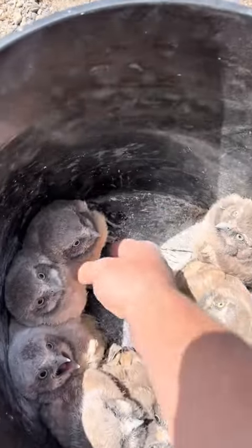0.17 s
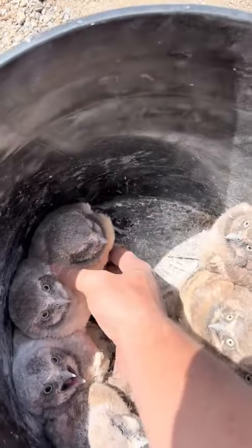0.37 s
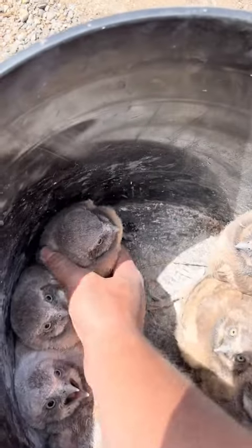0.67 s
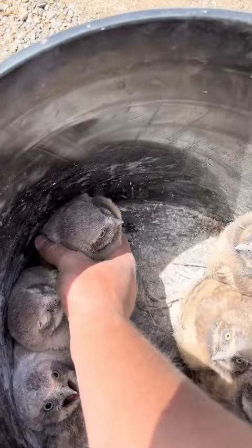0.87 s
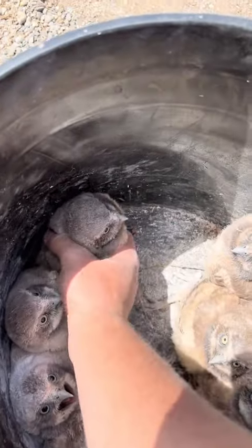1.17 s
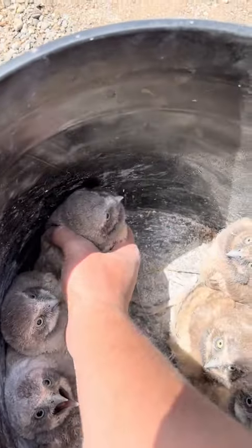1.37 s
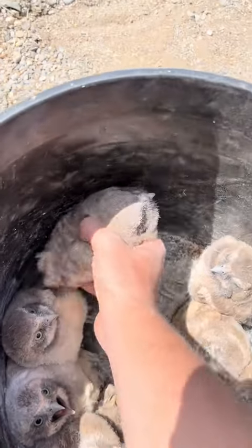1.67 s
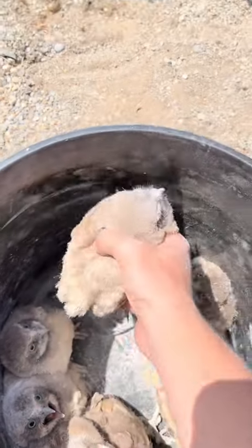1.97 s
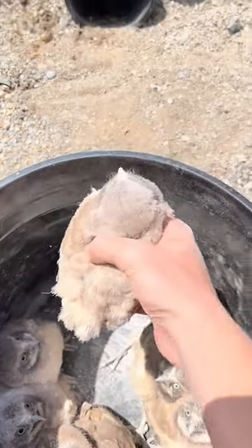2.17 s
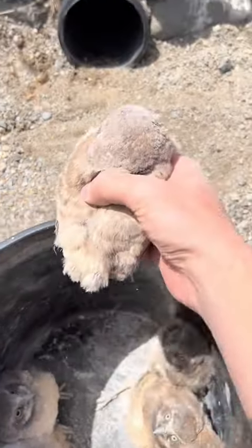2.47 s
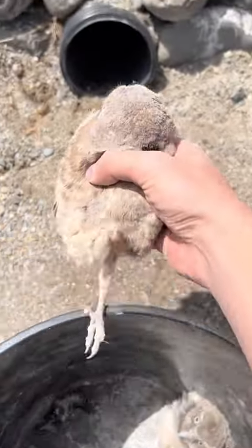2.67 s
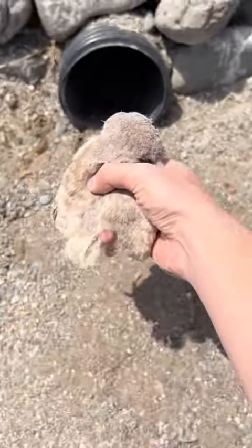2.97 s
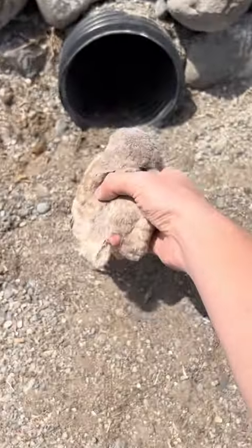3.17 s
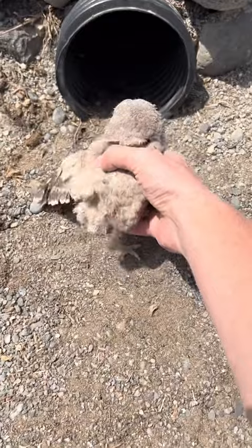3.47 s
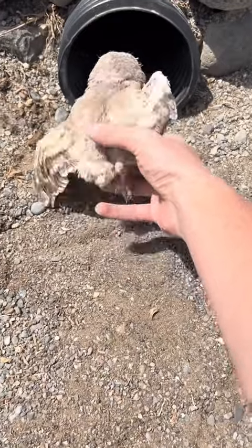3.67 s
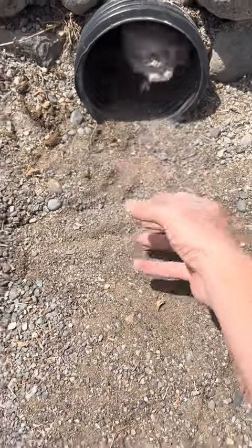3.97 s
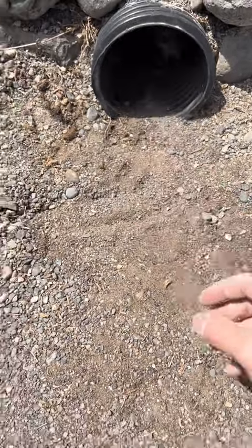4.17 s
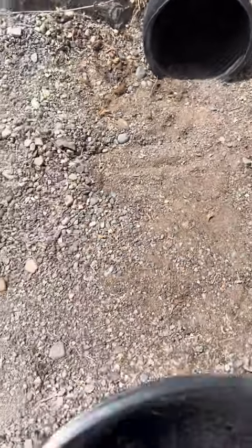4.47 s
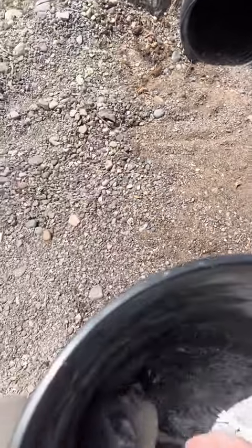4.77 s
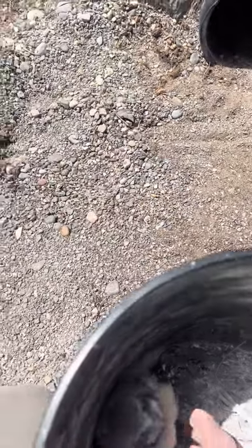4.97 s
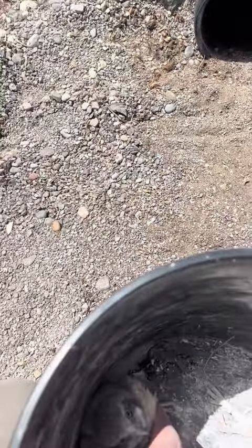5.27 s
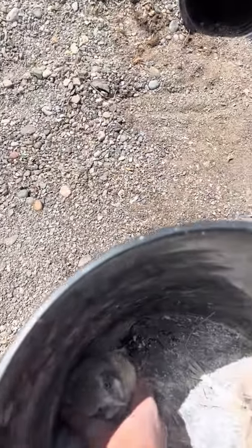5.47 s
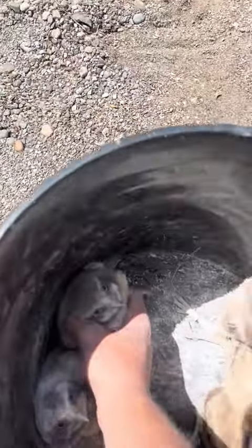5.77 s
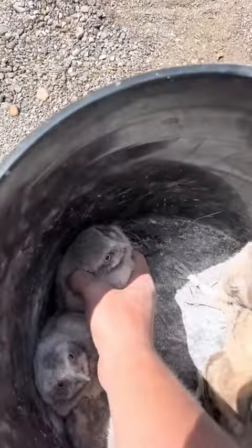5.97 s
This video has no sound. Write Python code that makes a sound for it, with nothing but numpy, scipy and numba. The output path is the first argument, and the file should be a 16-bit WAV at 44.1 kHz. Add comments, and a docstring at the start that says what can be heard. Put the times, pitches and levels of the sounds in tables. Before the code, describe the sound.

Close outdoor capture of owl chicks in a plastic bucket. A loud, rasping, high hiss runs about two seconds with dull handling thumps, then stops abruptly. A quieter gap holds faint down rustle and tiny taps. A softer, smoother hiss follows as a chick is carried to a pipe, with bumps at release, then a louder, brighter hiss takes over until the end.

```python
"""Long rattlesnake-like hisses of burrowing owl chicks, lifted by hand from a plastic bucket into a burrow pipe.
Fluttering noise excites a gliding throat resonance and the band of the open beak; near surfaces reflect it.
Noise bursts through damped resonators give the dull bumps and plastic knocks of handling.
Swelling filtered noise gives a faint rustle; shaped noise gives microphone rumble and quiet outdoor air."""
import sys
import numpy as np
from scipy import signal
from scipy.fft import rfft, irfft, next_fast_len
from scipy.io import wavfile
from numba import njit

SR = 44100
rng = np.random.default_rng(int(sys.argv[2]) if len(sys.argv) > 2 else 0)


def dump(signal):
    """Clip the signal to [-1, 1] and save it as 16-bit WAV at the path in sys.argv[1]."""
    limited = np.clip(np.atleast_2d(signal).T, -1, 1)
    pcm = np.round(limited * 32767).astype(np.int16)
    wavfile.write(sys.argv[1], SR, pcm)


N = 269451
TIME = np.arange(N) / SR  # t/s

# The hisses: [start t/s, end t/s, throat bandwidth per pass/Hz, low air level at start/dB, its fading/(dB/s)]
HISSES = [(-0.02, 2.03, 1500, -31.5, 4), (2.817, 4.5, 1130, -34.5, -1), (4.478, 6.2, 1810, -31, 4.5)]
# Articulation, one list per hiss: [t/s, throat level/dB, throat resonance f/Hz, beak level/dB, sizzle level/dB]
# (levels before the part trims)
EFFORT = [
    [(0.0, -21.5, 5800, -21.5, -36.5), (0.242, -16.5, 5890, -24.5, -34.5), (0.364, -16, 5930, -21.5, -40.5),
     (0.414, -17, 6000, -19.5, -35.5), (0.604, -20, 5990, -23, -38), (0.72, -26.5, 5900, -30, -33.5),
     (0.792, -24.5, 5740, -32, -34), (1.334, -22.5, 5700, -33, -38), (1.512, -25.5, 5560, -28, -40.5),
     (1.656, -20.5, 5720, -28, -41.5), (1.972, -27.5, 5700, -34, -46), (1.99, -30.5, 5630, -38, -46)],
    [(2.85, -31, 5580, -43, -38), (2.948, -27, 5660, -39, -38), (2.988, -28, 5720, -35, -36.5),
     (3.048, -23.5, 5810, -34, -42), (3.572, -29, 5880, -32.5, -43), (4.032, -28.5, 5740, -30.5, -41),
     (4.118, -22.5, 5750, -29.5, -42), (4.126, -31, 5730, -32, -42.5), (4.216, -23.5, 5950, -30, -40),
     (4.312, -24.5, 5620, -33.5, -37.5), (4.392, -29, 5950, -30.5, -36), (4.47, -23, 5830, -28.5, -36.5)],
    [(4.49, -28, 5800, -24, -37), (4.516, -20, 5840, -22, -34), (4.556, -19, 6070, -21.5, -32),
     (4.668, -16.5, 6150, -16, -35.5), (4.678, -18, 6100, -17.5, -39), (4.916, -21, 6060, -23, -34),
     (5.022, -18.5, 6140, -22, -35.5), (5.054, -18.5, 6190, -21, -40), (5.144, -18.5, 6090, -24, -35),
     (5.646, -23.5, 6070, -20.5, -40), (5.686, -26, 6082, -21, -36), (6.1, -24, 6130, -20.5, -37)],
]
THROAT_TRIM_DB, BEAK_TRIM_DB, SIZZLE_TRIM_DB = 1.5, 1, 3
ATTACK_S, RELEASE_S = 0.022, 0.042
# Brief surges and catches of the throat: [t/s, half length/s, level/dB]
SURGES = [(.065, .02, -4), (.29, 0.01, -4.5), (2.905, 0.01, -4.5), (4.103, 0.013, 3.5), (4.397, 0.034, -3)]
# Spectrum of the low air, one list per hiss: [f/Hz, relative level/dB]
LOW_AIR_SPECTRA = [
    [(350, -18.5), (700, -15.5), (1250, -7), (1550, -10), (2100, -6.5), (2750, -4), (3250, 3), (3650, -4.5),
     (4500, 4.5), (5000, 2.5), (6000, -30)],
    [(350, -25), (650, -13), (1200, -6.5), (1700, -10.5), (2150, -8), (2700, -3.5), (3000, -2.5), (3300, 1),
     (3900, 1.5), (4550, 6), (5250, 12), (6200, -60)],
    [(350, -38.5), (600, -13.5), (1200, -9), (1800, -10.5), (2300, -6), (2900, -6.5), (3450, 4.5),
     (4200, 4), (4700, 11.5), (5300, -9), (6200, -24)],
]
# Spectrum of the band added by the open beak: [f/Hz, relative level/dB]
BEAK_SPECTRUM = [(5200, -52), (5900, -33), (6400, -12.5), (6700, 12), (7250, 9), (7850, 8.5), (8100, -0.5),
                 (8580, -2), (8850, -54), (9500, -49)]
# Spectrum of the sizzle above it: [f/Hz, relative level/dB]
SIZZLE_SPECTRUM = [(8000, -0.5), (8800, -6), (9400, -11), (10300, -8), (10750, -2), (11100, 3), (11600, -7),
                   (11900, 3), (12150, -16.5), (12400, -30)]
# Depth of the rasp, strongest from the cornered chicks in the bucket: [t/s, rms level fluctuation/dB]
RASP = [(0, 1.8), (2, 1.3), (2.8, .7), (4.4, .9), (4.55, 1.9), (6.1, 1.4)]
# Bands in which the hiss sounds hollow: [from t/s, to t/s, centre f/Hz, bandwidth/Hz, depth per pass 0-1]
HOLLOWS = [(.65, 1.4, 4220, 451, 1), (0.694, 2.002, 3670, 200, 0.3), (1.45, 1.8, 4750, 450, 0.5),
           (2.8, 4.3, 4020, 250.7, 0.8), (2.999, 3.961, 3070, 202, 0.93), (3.1, 4.424, 1225, 1040, 0.56),
           (5.15, 6.2, 3250, 401, .55), (5.599, 6.2, 2840, 697, 0.5), (5.6, 5.88, 3640, 600, 0.5),
           (5.6, 6.2, 4680, 595, 0.5)]
# Echoes from the surfaces around the chicks: [mean extra path/m, level/dB]
ECHOES = [(0.471, -31.5), (.74, -27.5), (1.162, -23), (1.898, -11)]
# Spectrum of the scattered (left-right) sound before the side level is applied: [f/Hz, level/dB]
SCATTER_SPECTRUM = [(500, 1), (1500, -21), (3500, -6), (5800, -2.5), (6500, -19.5), (7600, -18),
                    (8200, -0.5), (9000, 0.5), (11000, 0), (13000, -8)]
# Swings to the right as the chicks and the microphone move: [t/s, half length/s, left minus right level/dB]
SWINGS = [(1.51, 0.077, -1), (1.89, .12, -0.5), (3.02, .25, -2), (4.19, .05, -1), (4.55, 0.11, -3)]
# Loudest dull bumps of handling and flapping: [t/s, peak level before gain/dB, centre f/Hz, push decay time/s]
BUMPS = [(0.202, -28.5, 157, 0.14), (0.381, -26, 163, 0.16), (0.409, -28.5, 189, 0.26),
         (0.437, -23, 165, 0.12), (0.591, -19.5, 125, 0.11), (0.779, -29, 92, 0.14),
         (1.145, -30.5, 277, 0.054), (1.317, -29, 135, 0.17), (1.337, -27.5, 242, 0.07),
         (1.375, -21, 103, 0.045), (1.54, -35.5, 239, 0.19), (2.036, -37, 230, 0.12),
         (2.075, -38, 159, 0.13), (2.158, -37, 175, 0.13), (2.186, -32.5, 223, 0.064),
         (2.262, -30.5, 178, 0.094), (2.542, -47.5, 81.5, 0.085), (2.823, -37, 80, 0.12),
         (3.25, -29.5, 206, 0.11), (3.384, -24, 150, 0.14), (3.418, -28.5, 104, 0.09),
         (3.906, -29.5, 121, 0.074), (4.023, -25, 117, 0.078), (4.049, -22, 89.5, 0.059),
         (4.079, -25, 208, 0.11), (4.173, -24.5, 106, 0.066), (4.206, -28.5, 86, 0.11),
         (4.265, -22, 270, 0.048), (4.496, -32, 175, 0.16), (4.557, -33, 89, 0.072),
         (4.725, -29.5, 234, 0.11), (5.065, -34, 101, 0.11), (5.914, -41.5, 295, 0.11)]
# Spells in which the hand grips, lifts, carries and lets go, shaking the microphone:
# [from t/s, to t/s, rumble level before trim/dB]
HANDLING = [(.22, 0.894, -41.5), (1.133, 2.297, -46.5), (1.316, 1.483, -36.5), (2.325, 2.933, -50),
            (3.116, 4.702, -47), (3.38, 3.471, -31.5), (3.667, 4.288, -39.5), (4.784, 5.33, -51)]
HANDLING_EDGE_S, RESTING_DB = 0.027, -60.5  # onset time of a spell; rumble level at rest, before trim
# Small random bumps: mean rate, level over the shaking (before the bump gain), spread of that level
JOSTLE_PER_S, JOSTLE_DB, JOSTLE_SPREAD_DB = 12, 3, 2.5
JOSTLE_HZ, JOSTLE_SPREAD_OCTAVES, JOSTLE_DECAY_S = 136, 0.41, 0.112
# Light knocks on plastic: [t/s, push level before resonance and gain/dB]
KNOCKS = [(1.752, -36), (2.542, -45.5), (2.575, -55.5), (2.671, -55.5), (2.749, -53), (3.183, -40.5),
          (3.813, -45), (4.938, -28.5), (5.918, -32)]
# Modes of the plastic: [f/Hz, bandwidth/Hz, relative level/dB]
PLASTIC_MODES = [(329, 120, -17), (930, 240, -19), (1568, 470, -2), (1950, 180, -21), (2540, 420, -25),
                 (3600, 940, -36)]
# Strokes of down on skin: [t/s, half length/s, level/dB]
RUSTLE_STROKES = [(2.012, 0.034, -56.5), (2.09, 0.081, -72), (2.375, 0.035, -69), (2.713, 0.078, -64.5),
                  (2.738, 0.0099, -70)]
# Spectrum of the rustle: [f/Hz, relative level/dB]
RUSTLE_SPECTRUM = [(400, -17), (800, 2), (1600, 1.5), (2800, -8), (5000, -10), (7500, -11), (9500, -17),
                   (12000, -17)]
# Spectrum of the microphone rumble: [f/Hz, relative level/dB]
RUMBLE_SPECTRUM = [(15, -39), (25, -22.5), (52, 7), (80, 8), (140, 2), (240, -5.5), (310, -24.5),
                   (490, -30), (900, -47.5)]
# Spectrum of the outdoor air: [f/Hz, relative level/dB]
OUTDOOR_SPECTRUM = [(120, -25), (200, 3), (425, -5.5), (609, -15), (984, -18), (1760, -29), (5010, -42.5),
                    (7430, -36.5), (12000, -52), (15600, -74), (22000, -120)]
OUTDOOR_DB = -62
TOP_HZ = 12400  # upper limit of the microphone


def hiss(flow, row, effort, air_spectrum):
    """Source-filter principle: turbulence excites a gliding throat resonance and fixed bands around it."""
    start, end, throat_width_hz, air_db, fade_db_per_s = row
    throat_db, throat_hz, beak_db, sizzle_db = curves(effort)
    surge_db = sum(db * swell(s, half) for s, half, db in SURGES)
    throat = flow
    for _ in range(3):  # three passes make the flanks steep
        throat = np.array([ring(channel, throat_hz, throat_width_hz) for channel in throat])
    throat = undb(THROAT_TRIM_DB + throat_db + surge_db) * unit(throat)
    beak = undb(BEAK_TRIM_DB + beak_db) * colour(flow, BEAK_SPECTRUM)
    air = undb(air_db - fade_db_per_s * (TIME - start)) * colour(flow, air_spectrum)
    sizzle = undb(SIZZLE_TRIM_DB + sizzle_db) * colour(flow, SIZZLE_SPECTRUM)
    return (throat + beak + air + sizzle) * gate(start, end, ATTACK_S, RELEASE_S)


def turbulence(rasp_rate=900, flutter_db=0.5, flutter_rate=70):
    """Jet noise: a narrow glottis passes air in uneven spurts, heard as direct and scattered sound."""
    rasp_db, = curves(RASP)
    spurts_db = rasp_db * wander(rasp_rate) + flutter_db * wander(flutter_rate)
    spurts = undb(spurts_db)
    direct = hollow(reflect(noise() * spurts))
    scattered = equalise(noise() * spurts, SCATTER_SPECTRUM)
    return direct, scattered


def reflect(x, sway=0.015):
    """Comb filtering: delayed copies interfere, with paths that shift as chicks and microphone move."""
    echoes = 0
    for metres, db in ECHOES:
        path = metres * (1 + sway * wander(3))
        echoes = echoes + undb(db) * np.interp(TIME - path / 343, TIME, x)  # speed of sound/(m/s)
    return x + echoes


def hollow(x, fade_s=0.15, drift=0.008):
    """Band rejection: subtracting a drifting resonance thins out its band for a while."""
    shift = 1 + drift * wander(5.8)
    for start, end, hz, width, depth in HOLLOWS:
        cancel = depth * gate(start - fade_s / 2, end + fade_s / 2, fade_s, fade_s)
        for _ in range(2):  # twice gives the hollow a broad floor
            x = x - cancel * ring(x, hz * shift, width)
    return x


def bumps(soft_hz=520, body_hz=225, body_db=-8, contact=9, gain_db=2):
    """Impact excitation: a scuff with a firm contact drives a damped low boom and a hollow body tone."""
    out = np.zeros(N)
    soft = signal.butter(3, soft_hz, fs=SR, output="sos")
    for s, db, hz, t60 in BUMPS + jostles():
        start, push = burst(s, t60, rise=0.0091)
        push[int(0.008 * SR)] += contact
        boom = ring(ring(push, hz, 0.98 * hz), hz, 0.98 * hz)
        body = undb(body_db) * ring(push, body_hz, 170)
        thud = signal.sosfilt(soft, boom + body)
        add(out, start, undb(db + gain_db) * thud / np.abs(thud).max())
    delayed = np.roll(out, SR // 300)
    return stereo(out, delayed, side_db=-20)


def jostles():
    """Random impacts: uneven small bumps follow the strength of the shaking, as rows like those of BUMPS."""
    shake_db = 20 * np.log10(shaking())
    rows = []
    for i, (late, loud, high) in enumerate(rng.standard_normal((150, 3))):
        s = (i + late / 2) / JOSTLE_PER_S
        if 0 < s < TIME[-1]:
            db = np.interp(s, TIME, shake_db) + JOSTLE_DB + JOSTLE_SPREAD_DB * loud
            hz = JOSTLE_HZ * 2 ** (JOSTLE_SPREAD_OCTAVES * high)
            rows.append((s, db, hz, JOSTLE_DECAY_S))
    return rows


def shaking():
    """Incoherent addition: overlapping spells of microphone shaking add in power; returned as a gain."""
    edge = HANDLING_EDGE_S
    power = undb(RESTING_DB) ** 2
    for start, end, db in HANDLING:
        power = power + (undb(db) * gate(start - edge / 2, end + edge / 2, edge, edge)) ** 2
    return np.sqrt(power)


def knocks(dull_hz=3200, gain_db=14):
    """Modal excitation: abrupt taps of claws and knuckles ring the modes of the plastic."""
    taps = np.zeros(N)
    for s, db in KNOCKS:
        start, push = burst(s, t60=0.058, rise=0.00018)
        add(taps, start, undb(db) * push)
    taps = signal.sosfilt(signal.butter(2, dull_hz, fs=SR, output="sos"), taps)
    return undb(gain_db) * sum(undb(db) * ring(taps, hz, width) for hz, width, db in PLASTIC_MODES)


def rustle():
    """Friction noise: down brushes on skin in small uneven grains."""
    strokes = sum(undb(db) * swell(s, half) for s, half, db in RUSTLE_STROKES)
    grains = undb(2 * wander(200))
    mid, side = (colour(noise() * grains, RUSTLE_SPECTRUM) for _ in range(2))
    return strokes * stereo(mid, side, side_db=-10)


def background(rumble_db=-1, sway_db=2):
    """Ambient noise: uneven rumble at the microphone over still outdoor air."""
    rumble = stereo(*(colour(noise(), RUMBLE_SPECTRUM) for _ in range(2)), side_db=-15)
    air = stereo(*(colour(noise(), OUTDOOR_SPECTRUM) for _ in range(2)), side_db=-9)
    rumble_gain = shaking() * undb(rumble_db + sway_db * wander(14))
    return rumble_gain * rumble + undb(OUTDOOR_DB) * air


def undb(db):
    """Level/dB to amplitude gain."""
    return 10 ** (np.asarray(db) / 20)


def unit(x):
    """Normalisation to rms 1."""
    return x / np.sqrt(np.mean(x ** 2))


def curves(table):
    """Linear interpolation in time of the columns of a table whose first column is t/s."""
    s, *columns = np.transpose(table)
    return [np.interp(TIME, s, c) for c in columns]


def equalise(x, points):
    """Linear filtering: multiply the spectrum by gains from [f/Hz, level/dB] points."""
    hz, db = np.transpose(points)
    size = next_fast_len(N)
    f = np.maximum(np.fft.rfftfreq(size, 1 / SR), 1)
    gain = undb(np.interp(np.log(f), np.log(hz), db, left=-90, right=-90))
    return irfft(rfft(x, size) * gain, size)[..., :N]


def colour(x, points):
    """Spectral shaping by [f/Hz, level/dB] points, at rms 1."""
    return unit(equalise(x, points))


@njit
def resonance(x, tangent, damping):
    """State-variable band-pass: a damped oscillator whose centre may move every sample."""
    y, band, low = np.empty(len(x)), 0., 0.
    for i in range(len(x)):
        g, k = tangent[i], damping[i]
        v = (band + g * (x[i] - low)) / (1 + g * (g + k))
        band, low, y[i] = 2 * v - band, low + 2 * g * v, k * v
    return y


def ring(x, hz, width):
    """Simple resonance: one mode, fixed or moving, with its bandwidth in Hz."""
    each = np.ones(len(x))
    return resonance(x + 1e-18, np.tan(np.pi * hz / SR) * each, width / hz * each)


def noise():
    """White noise: equal power at all frequencies."""
    return rng.standard_normal(N)


def wander(rate):
    """Random modulation: straight lines between chance values, rate per second, at rms 1."""
    return unit(np.interp(TIME * rate, np.arange(N // 10), rng.standard_normal(N // 10)))


def stereo(mid, side, side_db):
    """Mid-side principle: a common part, plus a scattered part of opposite sign left and right."""
    return mid + undb(side_db) * side * np.array([[1], [-1]])


def swell(s, half_length):
    """Gaussian envelope: a smooth rise to 1 and fall around a moment."""
    return np.exp(-((TIME - s) / half_length) ** 2)


def gate(start, end, attack, release):
    """Trapezoidal envelope: linear attack, hold at 1, linear release."""
    return np.clip(np.minimum((TIME - start) / attack, (end - TIME) / release), 0, 1)


def burst(s, t60, rise):
    """Transient: noise that swells and decays exponentially, with the sample where it starts."""
    age = np.arange(SR // 4) / SR
    decay = np.exp(-np.log(1000) * age / max(t60, 0.005))
    shape = (1 - np.exp(-age / rise)) * decay
    return max(int(s * SR), 0), rng.standard_normal(len(age)) * shape


def add(track, start, sound):
    """Superposition of a short sound on a track."""
    track[start:start + len(sound)] += sound[:max(N - start, 0)]


def scene():
    """Superposition of the panned hisses, the sounds of handling and the background."""
    flow = stereo(*turbulence(), side_db=-5)
    owls = sum(hiss(flow, *each) for each in zip(HISSES, EFFORT, LOW_AIR_SPECTRA))
    pan_db = sum(db * swell(s, half) for s, half, db in SWINGS)
    owls = owls * undb(np.array([pan_db, -pan_db]) / 2)
    return owls + bumps() + knocks() + rustle() + background()


def record(dry):
    """Band limitation: a steep low-pass cuts the top."""
    return signal.sosfilt(signal.ellip(8, 0.2, 60, TOP_HZ, fs=SR, output="sos"), dry)


dry = scene()
out = record(dry)
dump(out)
```